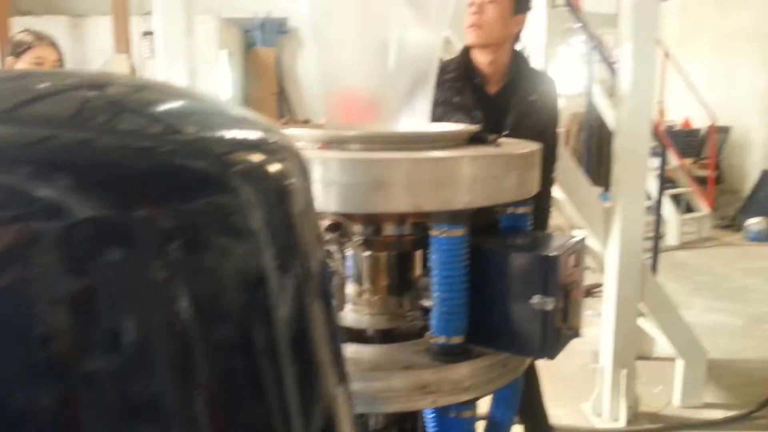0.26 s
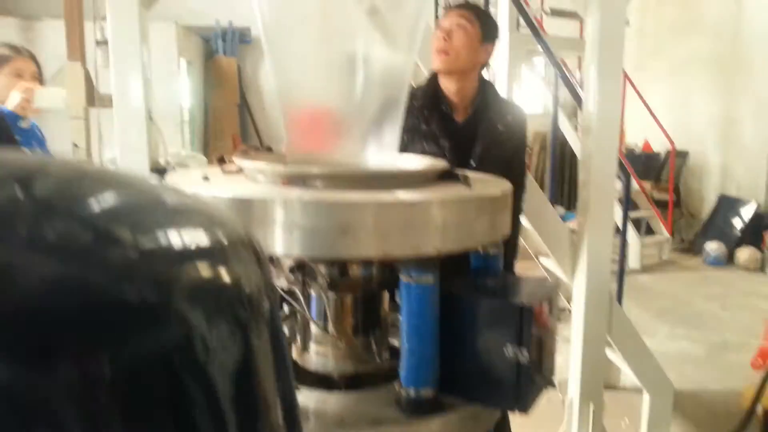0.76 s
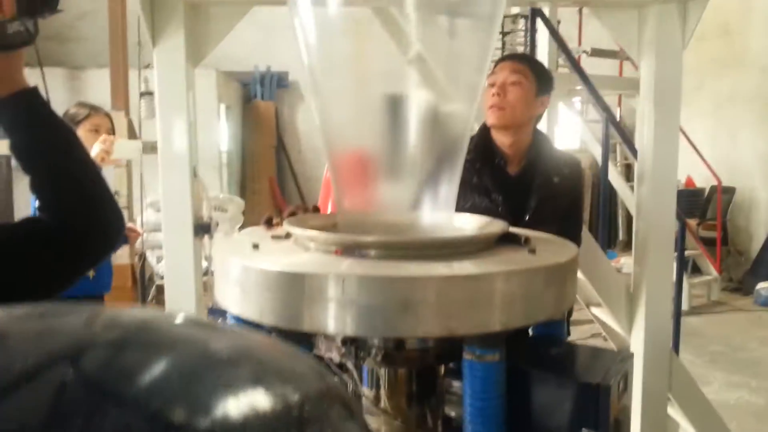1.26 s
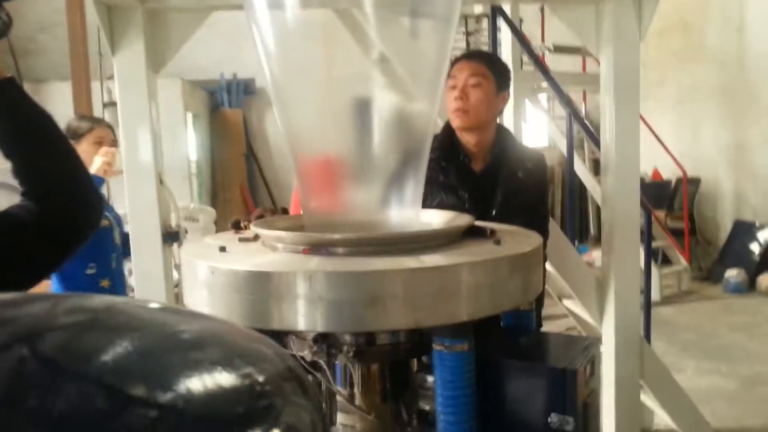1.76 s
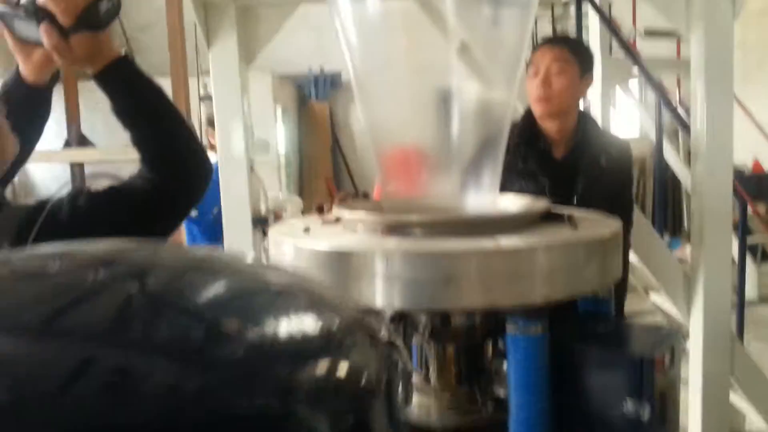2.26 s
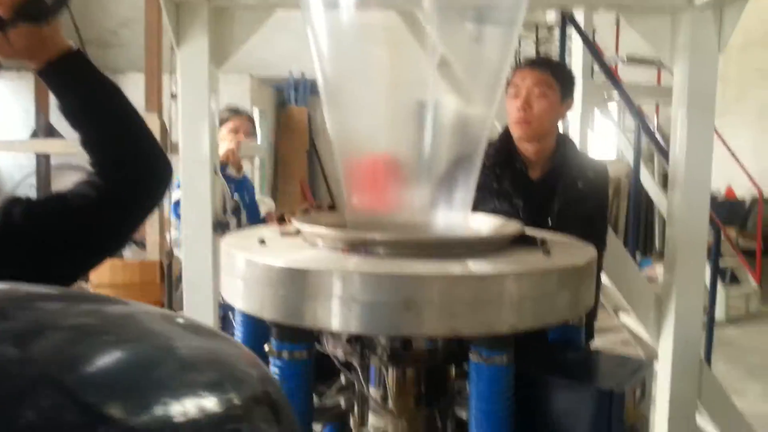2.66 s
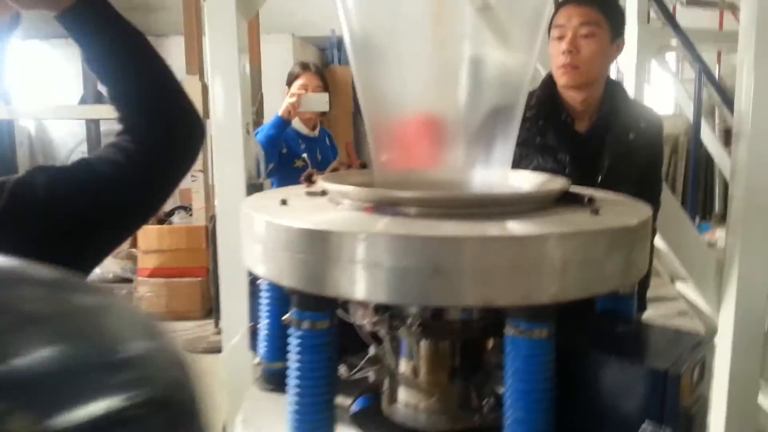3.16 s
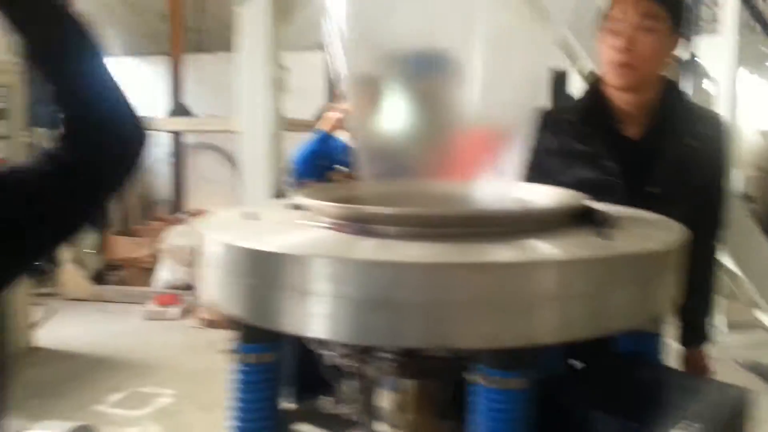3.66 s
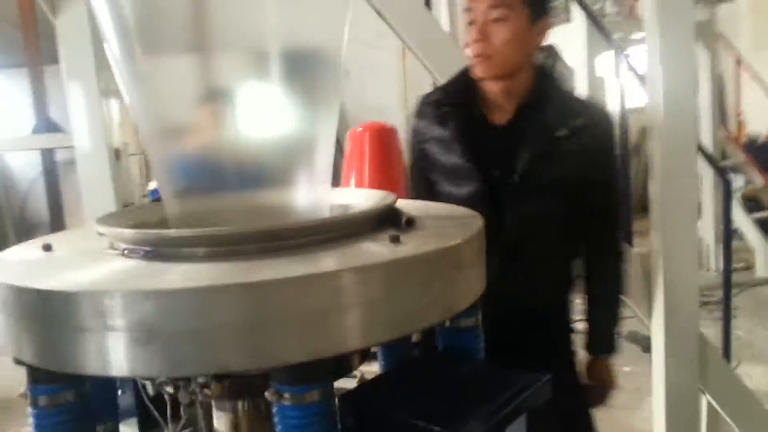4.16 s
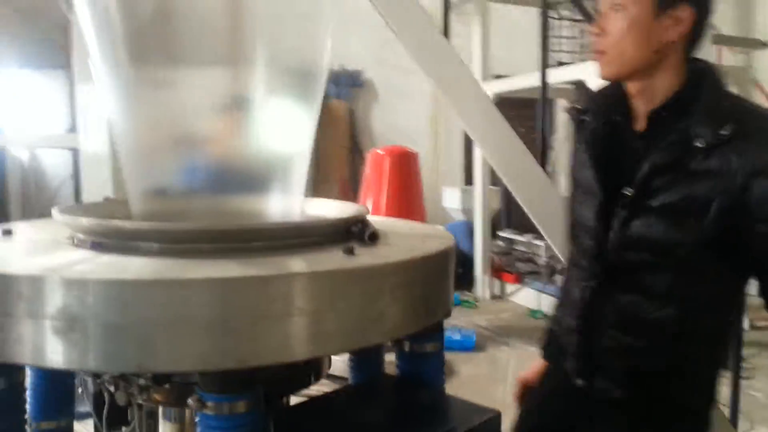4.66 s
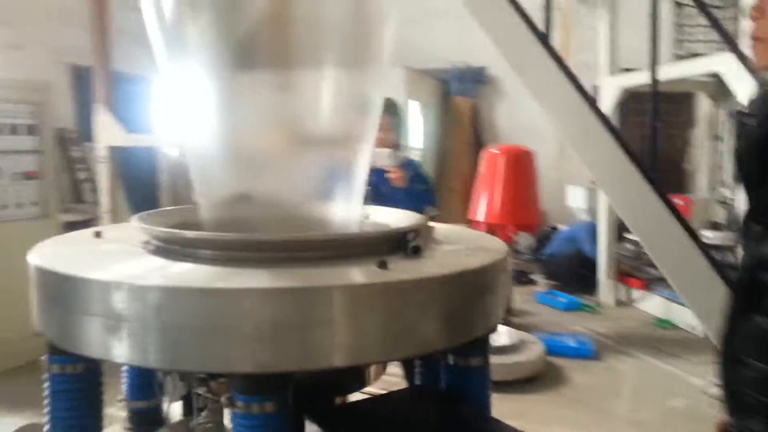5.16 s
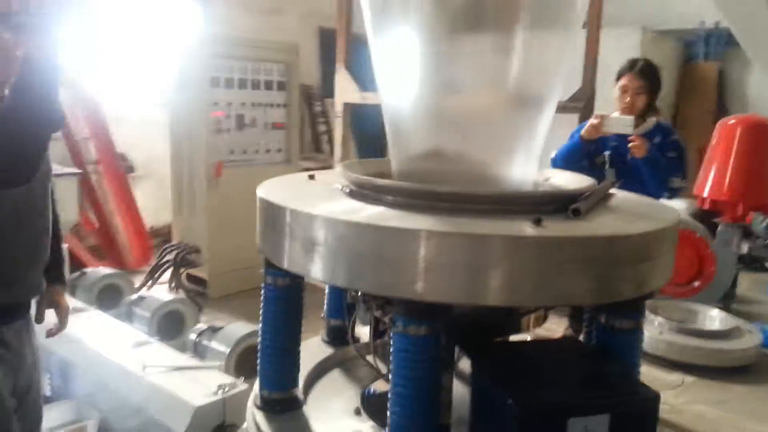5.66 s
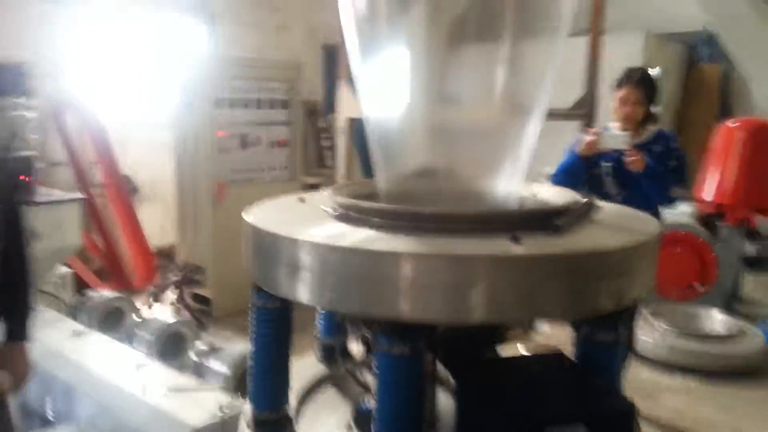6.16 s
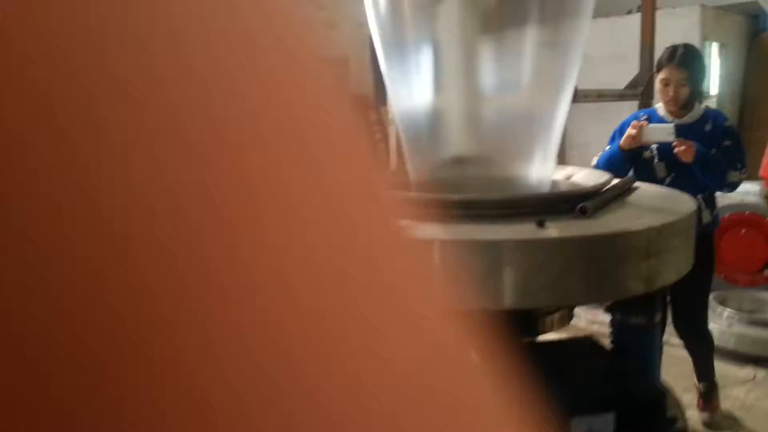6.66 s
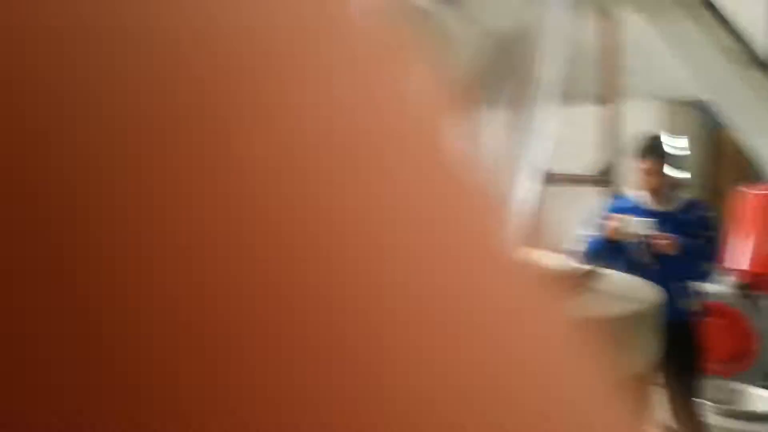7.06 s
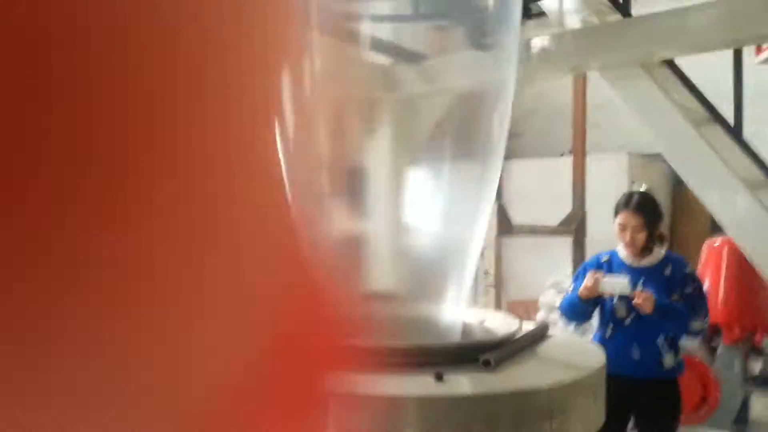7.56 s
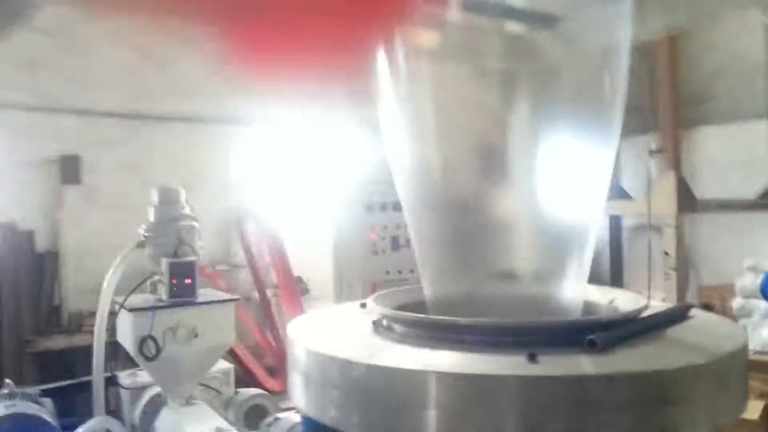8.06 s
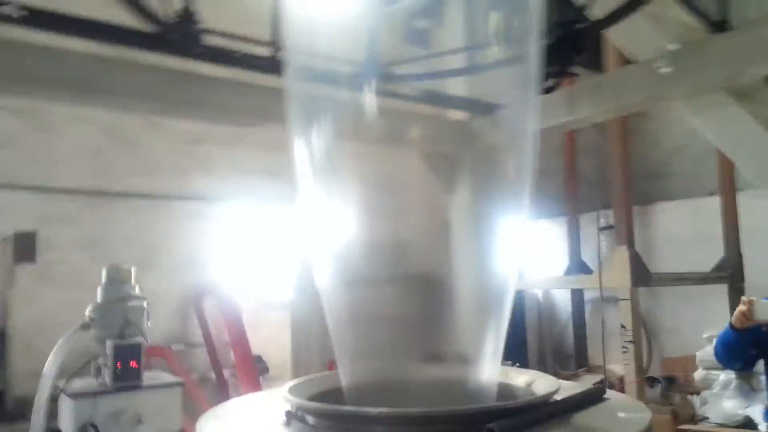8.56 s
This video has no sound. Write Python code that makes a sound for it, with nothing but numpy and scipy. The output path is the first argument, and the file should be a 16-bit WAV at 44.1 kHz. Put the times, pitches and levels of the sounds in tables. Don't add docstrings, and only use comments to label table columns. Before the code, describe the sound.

A dense, hissing blower roar runs without pause, coloured by hollow duct resonances, a steady low hum and a wavering low hoot that fades after about three seconds. A faint high whine stays over it. The phone is carried close and around the machine; a hand covers the right microphone, dulling its top. A breathy whistle swells midway and again at the end. The loud level makes the phone's limiter duck.

```python
import sys
import numpy as np
from scipy import signal
from scipy.fft import rfft, irfft, dct, next_fast_len
from scipy.io import wavfile
from scipy.ndimage import uniform_filter1d, minimum_filter1d

SR = 44100
rng = np.random.default_rng(int(sys.argv[2]) if len(sys.argv) > 2 else 0)


def log_audio(samples):
    frames = np.atleast_2d(samples).T
    limited = np.clip(frames, -1, 1)
    pcm = np.round(limited * 32767).astype(np.int16)
    wavfile.write(sys.argv[1], SR, pcm)


def field_ratio(decibels):
    return 10 ** (np.asarray(decibels, dtype=float) / 20)


N = 388080
SIZE = next_fast_len(N)
HZ = np.maximum(np.fft.rfftfreq(SIZE, 1 / SR), 1)
HOP = 40
SLOW_S = np.arange(N // HOP + 2) * HOP / SR
FRAME = 2048

# time in seconds, nearness to the extruder in dB, left port aimed at the
# air ring in dB, right port unshaded in dB, palm cupped behind in dB.
POSE = [(0.0, 1, 0, -3, 3.5), (0.8, 1, 0.5, -4.5, 2), (1.6, 0, .6, -0.5, 1.6), (2.2, -1, -0.5, -5, 2.2),
        (2.5, 1, -1, -1, -0.7), (2.9, 4.5, 0, -6, 0), (3.3, 1, -0.5, -10, -0.5), (4.3, 0.5, 0, -9, -1.5),
        (4.8, 4.5, 0, -6, -1.3), (5.3, 1.5, 3, -4, 1), (5.9, 1, 1, -3, 2), (6.4, 1, -0.5, 9.5, 5),
        (6.7, 3.5, -1.5, 12, -0.5), (7.1, 2, -5, 12, -1.5), (7.4, 3, -5, 11, -4.5), (7.7, 1.5, -3, 5.5, -2),
        (8.1, 5.5, -3.5, 8, -1), (8.6, 4.5, -4, 10.5, 0)]
# time in seconds, lead of left port over right in ms.
TURN = [
    (0, 0.034),
    (1.0, .03),
    (1.7, 0.039),
    (3.0, 0.025),
    (4.0, -0.086),
    (5.2, -0.23),
    (6.5, -.25),
    (8.8, -0.26),
]
# share of nearness [dB/dB],
# share of aim [dB/dB], share of cupping [dB/dB], change when fully turned in dB.
LEFT_SHARES = [(.9, -.2, 0.092, 1), (0.59, -.2, 0.55, 3), (0.038, .3, 0.2, 2.5), (.01, 1.01, 0.012, .1),
               (0.26, -1.9, 0.97, -4)]
# share of nearness [dB/dB], share of unshading [dB/dB],
# share of cupping [dB/dB], change when fully turned in dB.
RIGHT_SHARES = [(1.2, .1, 0, -0.3), (0.44, 0.46, -0.2, -0.5), (0.071, 0.51, 0.3, 3), (.01, 0.91, .01, -4),
                (.5, .3, -0.3, -4)]
PORT_BANDS_HZ = [1100, 1900, 2700, 6100, 11000]
# time in seconds, level at 13 kHz in dB.
TOP_BAND = [
    (0, 8.5),
    (2.3, 7.5),
    (2.5, 6),
    (3.1, 6),
    (3.16, -8.5),
    (8.25, -9),
    (8.4, 4),
    (8.8, 5),
]

# frequency in Hz, density in dB per Hz.
LEFT_AIR = [(25, -42), (45, -30), (110, -18.5), (200, -15), (720, -19.5), (1000, -18.5), (2500, -15.5),
            (4000, -20.5), (5000, -18.5), (6800, -18.5), (8000, -25), (9500, -35), (11000, -37.5),
            (13000, -68)]
# frequency in Hz, density in dB per Hz.
RIGHT_AIR = [(25, -41), (45, -34), (110, -21), (200, -18.5), (700, -23.5), (1600, -24), (2600, -25.5),
             (4000, -32), (5300, -25.5), (5900, -28), (8000, -23.5), (9500, -34), (11800, -40.5),
             (13400, -46.5)]
# frequency in Hz, width in Hz, boost in dB.
DUCT_MODES = [(150, 51, 4), (266.8, 9.9, 8.5), (320, 14, 10.5), (341.6, 6.1, 4.5), (426, 20.4, 9),
              (523.7, 37.2, 14), (622.6, 30.4, 9.5), (1062, 25, 3), (2540, 65, 3)]
# frequency in Hz, likeness from 0 to 1.
LIKENESS = [(30, 0.65), (60, 0.82), (130, 0.94), (280, 1), (620, 0.88), (1000, 0.57), (1800, 0.49),
            (4000, 0.21), (8000, 0.23)]

# time in seconds, blade tone in dB, gear tone in dB,
# gear tone left minus right in dB.
HUM = [(0.0, -24, -29, 14), (0.05, -20.5, -27, 7), (0.61, -23, -24.5, 5.5), (1.1, -24.5, -26, 9),
       (1.27, -22, -26, 12), (1.47, -22, -29.5, 12.5), (2.6, -22, -25.5, 9.5), (3.36, -27.5, -20, 6.5),
       (4.71, -25.5, -20.5, 1), (4.9, -25, -22, -1), (5.64, -22.5, -26, 9.5), (6.84, -23, -21, 9.5),
       (7.4, -20.5, -20.5, 7), (8.38, -24, -17, -1.5), (8.73, -21.5, -18.5, 1), (8.8, -28, -21.5, 3)]
HUM_HZ = [239.7, 495.0, 600.3]
# frequency in Hz, rms level in dB.
SMALL_TONES = [(254, -41.5), (289, -54.5), (300, -53), (349, -42), (544, -40), (691, -75), (966, -44)]
WHINE = [-54.0, -39.5, -40, -45.0, -40.5, -53, -74, -54, -55]
# start in seconds, length in seconds, level over its rest in dB.
WHISTLE = [
    (0.7, 3.8, 4),
    (4.4, 0.28, 6),
    (5.504, 1.19, 12),
    (7.7, 1.4, 11.5),
]

# time of the lowest gain in seconds, gain in dB.
DUCKS = [(0.261, -5.5), (1.093, -1), (2.085, -5), (2.873, 0), (3.314, -5.5), (3.634, -5.5), (3.809, -4.5),
         (3.833, -1), (4.361, -8), (4.38, -3), (4.8, -5), (5.348, -10.5), (5.686, -5), (5.927, -3.5),
         (5.962, -3.1), (6.177, -4.5), (7.069, 0), (7.52, -3.5), (7.562, -7), (7.989, -4.5), (8.255, -4),
         (8.526, -4)]
# frequency in Hz, step size in dB.
STORAGE_STEP = [(200, -16), (650, -8), (1400, -2), (2200, 0), (6500, 1), (8000, -.5), (14000, -2)]


def in_time(rows):
    s, *columns = np.transpose(rows)
    return np.array([np.interp(SLOW_S, s, column) for column in columns])


def at_hz(points, hz):
    point_hz, value = np.transpose(points)
    return np.interp(np.log(hz), np.log(point_hz), value)


def full(slow):
    return np.array([np.interp(np.arange(N) / HOP, np.arange(len(c)), c) for c in slow])


def drift(rate_hz):
    r = np.exp(-2 * np.pi * rate_hz * HOP / SR)
    slow = signal.lfilter([1], [1, -2 * r, r * r], rng.standard_normal(N // HOP + 2002))[2000:]
    return slow / np.std(slow)


def boost(hz, centre_hz, width_hz, db):
    return np.sqrt(1 + (field_ratio(2 * db) - 1) / (1 + (2 * (hz - centre_hz) / width_hz) ** 2))


def fading_lines(lines, width_hz, channels):
    spectrum = np.zeros(len(HZ))
    for hz, db in lines:
        near = slice(*np.searchsorted(HZ, [hz - 200, hz + 200]))
        shape = 1 / (1 + (2 * (HZ[near] - hz) / width_hz) ** 2)
        spectrum[near] += field_ratio(db) * shape * np.sqrt(len(HZ) / np.sum(shape ** 2))
    real, imaginary = rng.standard_normal((2, channels, len(HZ)))
    return irfft(spectrum * (real + 1j * imaginary) * np.sqrt(SIZE / 2), SIZE)[:, :N]


def turned():
    full_turn_ms = -0.26
    return np.clip(in_time(TURN)[0] / full_turn_ms, 0, 1)


def port_swell():
    near, aim, unshade, cup = in_time(POSE)
    left = np.array(LEFT_SHARES) @ [near, aim, cup, turned()]
    right = np.array(RIGHT_SHARES) @ [near, unshade, cup, turned()]
    return np.array([left, right])


def tone_levels():
    blade, gear, gear_pan = in_time(HUM)
    hidden_s, fade_s = 3.28, 0.17
    hidden = (1 + np.tanh((SLOW_S - hidden_s) / fade_s)) / 2
    mains = -32.0 - 14.5 * hidden
    side = np.array([[0.5], [-0.5]])
    blade_pan = 4.5 - 1.5 * turned()
    return np.array([blade + side * blade_pan, gear + side * gear_pan, mains + side * 6.5])


def air_at_ports():
    near, own = rng.standard_normal((2, SIZE))
    lead = np.resize(full(in_time(TURN))[0], SIZE) * SR / 1000
    far = near[np.clip(np.arange(SIZE) - np.round(lead).astype(int), 0, SIZE - 1)]
    alike = np.clip(at_hz(LIKENESS, HZ), 0, 1)
    left = rfft(near) * field_ratio(at_hz(LEFT_AIR, HZ))
    left = left * boost(HZ, 5782, 580, 10.88) * boost(HZ, 6200, 285, 9.27)
    right = (alike * rfft(far) + np.sqrt(1 - alike ** 2) * rfft(own)) * field_ratio(at_hz(RIGHT_AIR, HZ))
    right = right * boost(HZ, 6400, 400, 8.5) * boost(HZ, 7170, 390, 5.9)
    ducts = np.prod([boost(HZ, *mode) for mode in DUCT_MODES], axis=0)
    return np.array([left, right]) * ducts


def air_swell():
    blade_db, gear_db, pan_db = in_time(HUM)
    low_db = 0.45 * blade_db + 1.5 * drift(4.7)
    mid_db = 0.81 * gear_db + 1.5 * drift(1.0)
    pan_db = 0.23 * pan_db
    swell_db = []
    for port, side, mains_db in zip(port_swell(), (0.5, -0.5), tone_levels()[2]):
        low, mid = low_db + side * pan_db / 2, mid_db + side * pan_db
        curves = np.vstack([0 * low_db, low, mid, 0.095 * mains_db, port[[0, 0, 1, 2, 3, 4]]])
        usual = curves[:, :len(pan_db) * 2 // 3].mean(axis=1, keepdims=True)
        swell_db.append(np.vstack([curves - usual, in_time(TOP_BAND)]))
    return np.array(swell_db)


def blower(patchy_db=0.77, level_db=-41.0):
    air = air_at_ports() * field_ratio(level_db) * np.sqrt(SR / 2)
    centres = np.log([120, 350, 520, 620, 740] + list(PORT_BANDS_HZ) + [13000])
    out = 0
    for k, db in enumerate(np.swapaxes(air_swell(), 0, 1)):
        share = np.interp(np.log(HZ), centres, np.arange(len(centres)) == k)
        flicker_db = patchy_db * (drift(4.6) + drift(46.0))
        out = out + full(field_ratio(db + flicker_db)) * irfft(air * share, SIZE)[:, :N]
    return out


def hall(x, ripple_db=2.5, ripple_hz=90.0, ripple_s=0.67):
    hz, s, z = signal.stft(x, SR, nperseg=FRAME)
    chance = rng.standard_normal(z.shape)
    for axis, size in ((1, ripple_hz * FRAME / SR), (2, ripple_s * 2 * SR / FRAME)):
        size = max(round(size), 1)
        chance = uniform_filter1d(uniform_filter1d(chance, size, axis), size, axis)
    depth = np.interp(hz, [0, 1200, 2500, 5000], [0, 1, 1, 0.55])[:, None]
    gain_db = ripple_db * depth * chance / chance.std()

    near, aim, unshade, cup = [np.interp(s, SLOW_S, c) for c in in_time(POSE)]
    hollow = np.exp(-((hz - 4200) / 900) ** 2)[:, None]
    hollow_db = 1.56 * np.outer([-0.9, -0.83], cup)
    slope = (np.tanh((hz - 6100) / 500) * np.exp(-((hz - 6100) / 1500) ** 2))[:, None]
    tilt_db = 0.52 * np.array([0.86 * aim - 1, -0.04 * unshade + 1.6])
    gain_db = gain_db + hollow_db[:, None] * hollow + tilt_db[:, None] * slope

    ridge = np.exp(-((hz - 6040) / 450) ** 2) - 0.5 * np.exp(-((hz - 6040) / 1300) ** 2)
    thumb_on = np.clip((2.35 - s) / 0.23, 0, 1)
    gain_db[0] += 3.5 * np.outer(ridge, thumb_on)
    return signal.istft(z * field_ratio(gain_db), SR, nperseg=FRAME)[1][:, :N]


def hum(level_db=0.25):
    lead_ms = in_time(TURN)
    out = fading_lines(SMALL_TONES, 0.42, channels=1) * field_ratio(np.array([[0], [-4.5]]))
    for hz, db in zip(HUM_HZ, tone_levels()):
        phase = 0.6 * drift(0.38) + 0.6 * np.pi * hz * lead_ms / 1000 * [[1], [-1]]
        tone = np.sqrt(2) * np.sin(2 * np.pi * hz * np.arange(N) / SR + full(phase))
        out = out + full(field_ratio(db + level_db + drift(6.7))) * tone
    return out


def whine():
    switching_hz, sideband_hz = 8042.0, 84.8
    shade_db = port_swell()[:, 4] + np.array([[1.3], [3.5]])
    lines = [(switching_hz + k * sideband_hz, db) for k, db in enumerate(WHINE, start=-3)]
    return full(field_ratio(shade_db)) * fading_lines(lines, 5.8, channels=2)


def hoot():
    pitch_hz = 324.0 + 5.0 * drift(1.6)
    flutter_db = 3.9 * drift(4.0)
    mains_db = tone_levels()[2].mean(axis=0)
    hz, db = full([pitch_hz, mains_db - 3 + flutter_db])
    return field_ratio(db + np.array([[2.2], [-2.2]])) * np.sqrt(2) * np.sin(2 * np.pi * np.cumsum(hz) / SR)


def whistle():
    edge_s = 0.12
    swell_db = 0
    for s, length, db in WHISTLE:
        inside_s = np.minimum(SLOW_S - s, s + length - SLOW_S)
        swell_db = swell_db + db * np.clip(inside_s / edge_s, 0, 1)
    level_db = -40.5 + swell_db + 4 * drift(2.8) + np.array([[0], [-5.0]])
    return full(field_ratio(level_db)) * fading_lines([(1490, 0.0086)], 70.0, channels=2)


def squeak():
    start_s, length_s = 2.87, 0.13
    u = np.clip((np.arange(N) / SR - start_s) / length_s, 0, 1)
    note = np.sin(2 * np.pi * np.cumsum(778.0 - 68.0 * u) / SR)
    return field_ratio(-29.0 + np.array([[2.2], [-2.2]])) * np.sin(np.pi * u) * note


def scene():
    return hall(blower()) + hum() + whine() + hoot() + whistle() + squeak()


def limiter(x, ceiling=1.0, ratio=1.0):
    block_s = 1024 / 48000
    place = np.arange(N) / SR / block_s + 0.3
    block = place.astype(int)
    starts = np.searchsorted(block, np.arange(block[-1] + 1))
    peaks = np.maximum.reduceat(np.abs(x).max(axis=0), starts)
    cut_db = -ratio * 20 * np.log10(np.maximum(np.r_[0, peaks] / ceiling, 1))
    s, db = np.transpose(DUCKS)
    duck_s = np.ravel(s[:, None] + [-0.014, 0.002, 0.004])
    duck_db = np.interp(np.arange(N) / SR, duck_s, np.ravel(db[:, None] * [0, 1.1, 0]))
    return x * field_ratio(uniform_filter1d(cut_db[block] * (place - block) + duck_db, size=60))


def rounded(x, top=0.88, size=88):
    room = np.minimum(top / np.maximum(np.abs(x).max(axis=0), 1e-6), 1)
    room = minimum_filter1d(room, size=2 * size + 1)
    return x * uniform_filter1d(uniform_filter1d(room, size=size), size=size)


def phone_storage(x, sway_db=1.53, follow=0.6):
    hop, half, offset = FRAME // 2, FRAME // 4, 812
    window = signal.windows.kaiser_bessel_derived(FRAME, 4 * np.pi)
    blocks = np.pad(x, ((0, 0), (FRAME - offset, FRAME + (offset - N) % hop))).reshape(2, -1, hop)
    frames = np.concatenate([blocks[:, :-1], blocks[:, 1:]], axis=2) * window
    a, b, c, d = np.split(frames, 4, axis=2)
    bins = dct(np.concatenate([-c[..., ::-1] - d, a - b[..., ::-1]], axis=2), type=4, norm="ortho")

    sway = uniform_filter1d(rng.standard_normal((*bins.shape[:2], 32)), size=3, axis=1)
    sway = sway.repeat(hop // 32, axis=2)
    power = np.mean(bins ** 2, axis=2, keepdims=True)
    loud_db = 10 * np.log10(uniform_filter1d(power, size=9, axis=1) + 1e-3)
    hz = (np.arange(hop) + 0.5) * SR / FRAME
    step_db = np.reshape([-19, -21.5], (2, 1, 1)) + at_hz(STORAGE_STEP, hz)
    step_db = step_db + sway_db * sway / sway.std()
    step = field_ratio(step_db + follow * (loud_db - loud_db.mean(axis=1, keepdims=True)))
    whole = np.floor((np.abs(bins) / step) ** 0.75 + 0.4054)
    bins = np.sign(bins) * step * whole ** (4 / 3) * (hz < 14520)

    back = dct(bins, type=4, norm="ortho")
    u, v = back[..., :half], back[..., half:]
    frames = np.concatenate([v, -v[..., ::-1], -u[..., ::-1], -u], axis=2) * window
    out = frames[:, 1:, :hop] + frames[:, :-1, hop:]
    return out.reshape(2, -1)[:, hop - offset:][:, :N]


def low_pass(x):
    return signal.sosfilt(signal.butter(12, 14700, fs=SR, output="sos"), x)


def record(dry):
    mix = phone_storage(rounded(limiter(dry)))
    return low_pass(mix)


dry = scene()
out = record(dry)
log_audio(out)
```